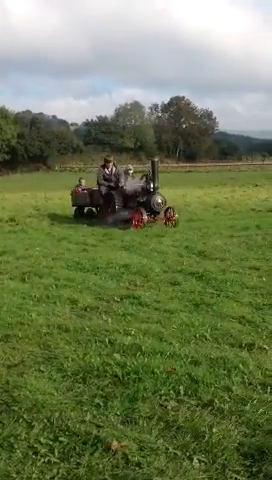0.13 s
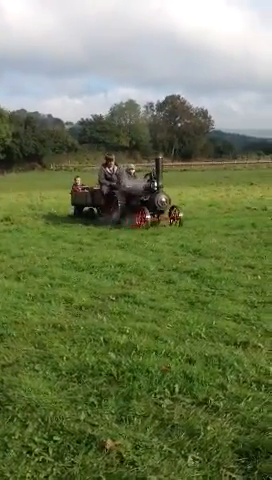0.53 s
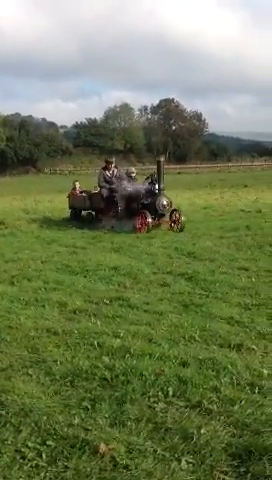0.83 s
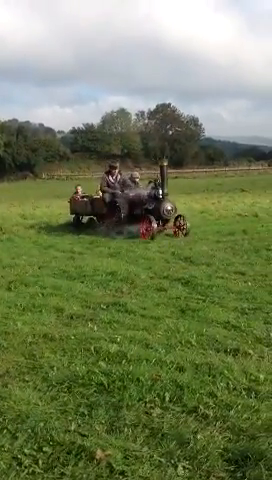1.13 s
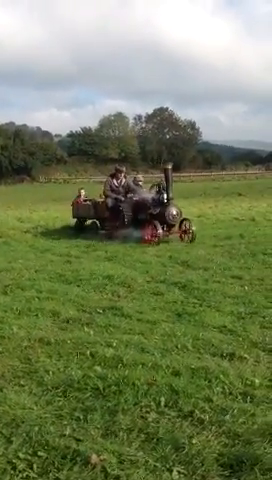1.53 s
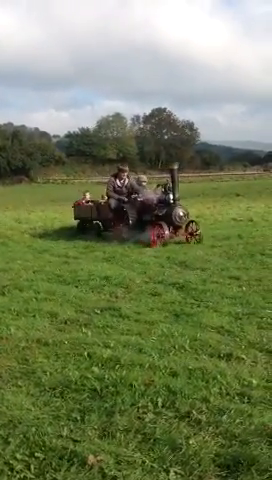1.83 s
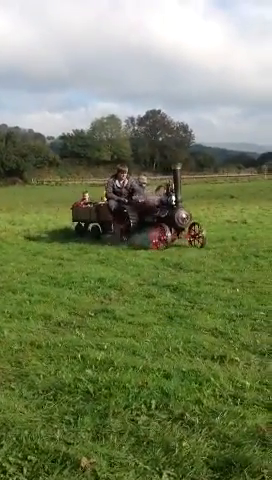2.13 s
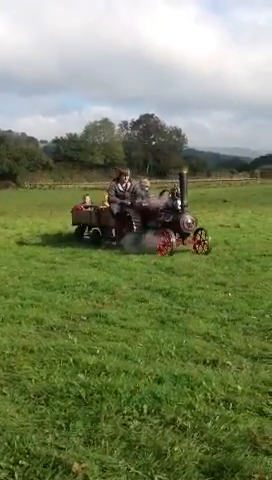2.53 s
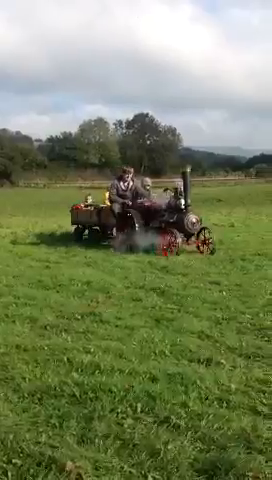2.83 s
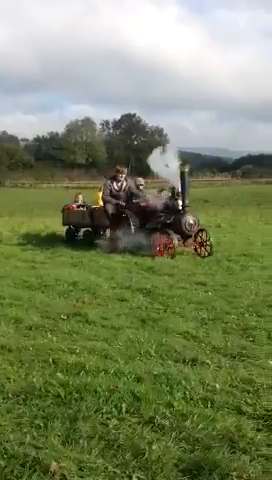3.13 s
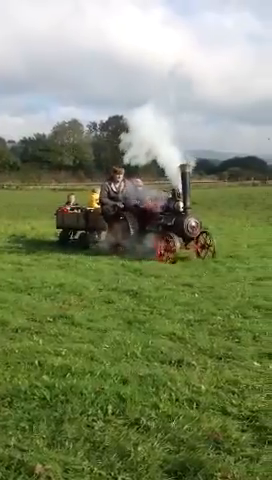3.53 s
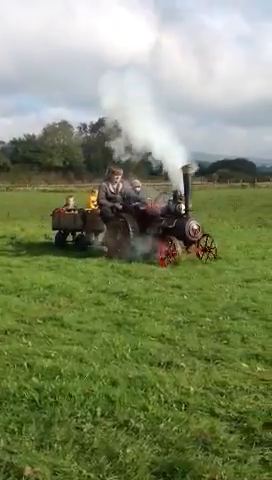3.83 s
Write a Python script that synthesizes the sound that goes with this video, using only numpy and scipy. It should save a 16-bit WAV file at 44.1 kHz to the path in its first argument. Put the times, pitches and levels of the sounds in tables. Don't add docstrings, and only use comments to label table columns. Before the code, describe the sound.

A small steam engine chuffs evenly, about seven crisp, breathy bursts a second, each with a hollow chimney ring and soft low thump, over faint gear drone and distant rumble. The chuffs change colour as it nears. Tiny high squeaks chirp at 1.65-1.85 s. At 2.9 s a whistle starts softly, climbs around 3.2 s, then turns shrill, rough and hissing until 4 s, over weaker chuffs. Open field, single phone microphone.

```python
import sys
import numpy as np
from scipy import signal
from scipy.fft import rfft, irfft
from scipy.io import wavfile
from scipy.ndimage import uniform_filter1d, map_coordinates

SR = 44100
rng = np.random.default_rng(int(sys.argv[2]) if len(sys.argv) > 2 else 0)


def volts(x):
    e = np.asarray(x, float) / 20
    return 10 ** e


def log_audio(samples):
    frames = np.atleast_2d(samples).T
    limited = np.clip(frames, -1, 1)
    pcm = np.round(limited * 32767).astype(np.int16)
    wavfile.write(sys.argv[1], SR, pcm)


N = 176400

# (frequency [Hz], density [dB per Hz])
FIELD_COLOUR = [(35, -50), (60, -21), (226, 4), (705, -7.5), (849, -12), (1590, -8.5), (2010, -11),
                (5580, -14.5), (15500, -27)]
# (frequency [Hz], width [Hz], level [dB])
GEAR_DRONES = [(157.6, 11, -44), (230.9, 2.6, -39.5), (314.2, 4.7, -44.5), (1495, 18, -48)]
# (time [s], gain [dB])
DUCKING = [
    (0, -5),
    (2.9, -3),
    (3.4, -7),
    (4, -8.5),
]
# (time [s], peak level [dB], brightness [dB])
BEATS = [(0.057, -14.5, 2.5), (0.223, -13.5, 0), (0.365, -12.5, -1), (0.524, -16.5, 2), (0.661, -11.5, -2),
         (0.818, -13, -1.5), (0.963, -13, 1), (1.117, -11.5, -2), (1.259, -11, -2), (1.416, -15.5, 2),
         (1.552, -11, -1.5), (1.708, -13, -1), (1.845, -11.5, 0), (1.995, -10.5, -2.5),
         (2.136, -11.5, -0.5), (2.298, -10, -3), (2.439, -11, -1.5), (2.591, -11.5, -1), (2.728, -10, -1),
         (2.879, -10.5, -2), (3.009, -12, -1), (3.157, -11.5, -1), (3.292, -15.5, -2), (3.445, -16, -4),
         (3.569, -16, -2), (3.71, -15.5, -4), (3.846, -19, 0.5), (3.986, -20.5, 1.5)]
# (frequency [Hz], width [Hz], level [dB])
CHIMNEY = [(607, 94, -10), (865, 79, -2), (987, 69, -4.5), (1232, 40, -4.5)]
# (frequency [Hz], density [dB per Hz])
JET_FAR = [(760, -27), (1300, -1), (1580, -12), (2010, 0), (2860, -9.5), (3140, -5.5), (5550, -8),
           (15500, -20)]
# (frequency [Hz], density [dB per Hz])
JET_NEAR = [(760, -33), (1300, -9.5), (1810, -3), (3200, -6.5), (3480, -8), (5110, -6.5), (11400, -14),
            (15500, -20)]
# (frequency [Hz], density [dB per Hz])
PUFF_COLOUR = [(60, -44), (130, -1.5), (180, 0.5), (400, -1), (700, -43)]
# (frequency [Hz], level [dB], T60 [s])
BOILER_BOOM = [(99, -33, .09), (71, -47, 0.38)]
# (time [s], length [s], level [dB], pitch [Hz])
SQUEAKS = [
    (1.642, 0.067, -23, 4905),
    (1.698, .06, -37, 4900),
    (1.748, 0.043, -25, 4865),
    (1.792, 0.013, -30, 4870),
    (1.825, .025, -36, 4860),
]
# (time [s], pitch [Hz], first partial level [dB], third partial level [dB])
WHISTLE = [
    (2.905, 1326, -25, -56),
    (2.935, 1436, -19, -65),
    (3.135, 1438, -21, -62),
    (3.2, 1546, -16.5, -37),
    (3.255, 1611, -15.5, -17.5),
    (3.38, 1648, -14, -17.5),
    (3.6, 1654, -17, -20),
    (3.78, 1678, -16, -17),
    (4, 1664, -22, -16.5),
]
# (time [s], flow level [dB])
STEAM_FLOW = [
    (2.9, -46),
    (3.14, -36.5),
    (3.2, -26.5),
    (3.3, -22),
    (3.6, -23),
    (4, -21.5),
]
# (time [s], length [s], depth [dB])
CHOKES = [
    (3.18, 0.012, -6),
    (3.215, 0.0037, -4),
    (3.369, .007, -8.5),
    (3.376, 0.021, -6.5),
    (3.571, 0.033, -11),
    (3.83, 0.021, -11.5),
]
# (frequency [Hz], density [dB per Hz])
HISS_LOW = [(400, -30), (1000, -11.5), (1900, -8), (2500, -8), (4000, -7), (5450, 0.5)]
# (frequency [Hz], density [dB per Hz])
HISS_HIGH = [(3530, -31), (6000, -3), (14400, -6), (15500, -10)]


def unit(x):
    return x / np.sqrt(np.mean(x ** 2) + 1e-20)


def along(points, hz):
    f, db = np.transpose(points)
    return volts(np.interp(np.log(hz + 1), np.log(f + 1), db))


def curves(rows):
    s, *columns = np.transpose(rows)
    return [np.interp(np.arange(N) / SR, s, column) for column in columns]


def wobble(rate):
    knots = rng.standard_normal(int(N * rate / SR) + 4)
    return map_coordinates(knots, [np.arange(N) * rate / SR])


def peak(f, hz, width_hz):
    return 1j * f * width_hz / (hz * hz - f * f + 1j * f * width_hz)


def noise(response, patchy_db):
    z = signal.stft(rng.standard_normal(N + 512), nperseg=512)[2]
    patches = uniform_filter1d(rng.standard_normal(z.shape), size=5, axis=0)
    patches = uniform_filter1d(patches, size=8, axis=1)
    x = signal.istft(z * volts(patchy_db * unit(patches)), nperseg=512)[1][:N]
    return unit(irfft(rfft(x) * response(np.fft.rfftfreq(N, 1 / SR)), N))


def field():
    duck_db, = curves(DUCKING)
    leak = (2430, 40, -45)
    drones = 0
    for hz, width_hz, db in list(GEAR_DRONES) + [leak]:
        drones = drones + volts(db) * noise(lambda f: peak(f, hz, width_hz), patchy_db=-0.2)
    rumble = volts(-30 + 0.68 * wobble(45)) * noise(lambda f: along(FIELD_COLOUR, f), patchy_db=1.3)
    return volts(duck_db) * (rumble + drones)


def on_beats(stroke, lead_s, levels_db):
    track = np.zeros(N + SR)
    for beat, db in zip(BEATS, levels_db):
        start = max(round((beat[0] - lead_s) * SR), 0)
        track[start:start + len(stroke)] += volts(db) * stroke
    return track[:N]


def chimney_response(f):
    power = (volts(-32) * f ** 2 / (f ** 2 + 450 ** 2)) ** 2
    for hz, width_hz, db in CHIMNEY:
        power = power + abs(volts(db) * peak(f, hz, 1.37 * width_hz) ** 2) ** 2
    split_hz = 1440
    return np.sqrt(power) / (1 + (f / split_hz) ** 8)


def jet_noise():
    near_from_s, near_to_s = 0.92, 2.21
    nearness = np.clip((np.arange(N) / SR - near_from_s) / (near_to_s - near_from_s), 0, 1)
    angle = np.pi / 2 * nearness
    far = np.cos(angle) * noise(lambda f: along(JET_FAR, f), patchy_db=2.0)
    return far + np.sin(angle) * noise(lambda f: along(JET_NEAR, f), patchy_db=2.0)


def steam_jets():
    t = np.arange(SR // 2) / SR
    _, db, bright_db = np.transpose(BEATS)
    lead_s, rise_s = 0.0076, 0.0095
    rise = 1 - np.exp(-(t / rise_s) ** 2)
    burst = rise * (volts(-60 * t / 0.14) + volts(-3 - 60 * t / 0.25))
    ring = rise * volts(-13.5 - 60 * t / 0.5)
    edge = rise * volts(-7 - 60 * t / 0.079)
    low = on_beats(burst + ring, lead_s, db - 9)
    high = on_beats(burst, lead_s, db + bright_db - 1.5)
    crisp = on_beats(edge, lead_s, db + bright_db)
    chimney = low * volts(0.65 * wobble(120)) * noise(chimney_response, patchy_db=0.5)
    jet = high * volts(0.8 * wobble(150)) * jet_noise()
    return chimney + jet + crisp * noise(lambda f: f ** 2 / (f ** 2 + 6000 ** 2), patchy_db=3.0)


def ground_bounce(direct):
    extra_s, growth, gain = 0.0003153, 0.00003, 0.13
    n = np.arange(N)
    bounce = map_coordinates(direct, [n - extra_s * SR - growth * n], mode="nearest")
    return (direct + gain * bounce) / np.sqrt(1 + gain ** 2)


def chimney_puffs():
    t = np.arange(SR // 2) / SR
    puff = (1 - np.exp(-(t / 0.013) ** 2)) * volts(-60 * t / 0.28)
    levels_db = -28.5 + 0.61 * (np.transpose(BEATS)[1] + 12)
    push = on_beats(puff, 0.0076 + 0.011, levels_db)
    return push * noise(lambda f: along(PUFF_COLOUR, f), patchy_db=0.6)


def boiler_booms():
    t = np.arange(SR // 2) / SR
    boom = sum(volts(db - 60 * t / t60) * np.sin(2 * np.pi * hz * t) for hz, db, t60 in BOILER_BOOM)
    return on_beats(boom, 0.0041, 1.5 * rng.standard_normal(len(BEATS))) * volts(curves(DUCKING)[0])


def exhaust():
    return ground_bounce(steam_jets()) + boiler_booms() + chimney_puffs()


def squeak():
    t, out = np.arange(N) / SR, 0
    for s, length_s, db, hz in SQUEAKS:
        swell = np.sin(np.pi * np.clip((t - s) / length_s, 0, 1)) ** 0.66
        sagging_hz = hz - 150 * (t - s - length_s)
        out = out + volts(db + 3) * swell * np.sin(2 * np.pi * sagging_hz * (t - s))
    return out


def whistle_tone(flow_db):
    hz, first_db, third_db = curves(WHISTLE)
    t = np.arange(N) / SR
    phase = 2 * np.pi * np.cumsum(hz * (1 + 0.00214 * wobble(90))) / SR

    choke_db = sum(db * np.exp(-((t - s) / length_s) ** 2) for s, length_s, db in CHOKES)
    blowing = np.clip((flow_db + 55) / 15, 0, 1)
    flutter_db = 1.5 * blowing * (0.68 * wobble(200) + 0.27 * wobble(25.06))
    warble_db = 4.5 * np.exp(-((t - 3.26) / 0.06) ** 2) * np.sin(2 * np.pi * 47 * t + 0.8 * wobble(20))
    first = volts(first_db + choke_db + flutter_db + warble_db) * np.sin(phase)

    second_in = np.clip((t - 3.185) / 0.22, 0.03, 1)
    second_db = flow_db - 5.5 + 5.1 * (t - 3.5) + 1.4 * wobble(55)
    second = second_in * volts(second_db) * np.sin(2 * phase)

    rough_db = wobble(200) + 0.8 * wobble(30)
    third = volts(third_db + rough_db) * np.sin(3 * phase + 0.21 * wobble(200))
    fourth = volts(flow_db - 17 + 4.2 * wobble(60)) * np.sin(4 * phase)
    return first + second + third + fourth


def whistle_steam(flow_db):
    third_db = curves(WHISTLE)[2]
    colour = [(100, -120)] + list(HISS_LOW) + list(HISS_HIGH)[1:]
    hiss = noise(lambda f: along(colour, f), patchy_db=0.1)
    skirt = noise(lambda f: peak(f, 4814, 240) ** 2 / (1 + (f / 5100) ** 40), patchy_db=-0.5)
    skirt = volts(-3.5 + np.minimum(third_db + 22, 0)) * skirt
    return volts(flow_db + 0.8 * wobble(7.2)) * (hiss + skirt)


def whistle():
    flow_db, = curves(STEAM_FLOW)
    valve = np.clip((np.arange(N) / SR - WHISTLE[0][0]) / 0.0095, 0, 1)
    return valve * (np.sqrt(2) * whistle_tone(flow_db) + whistle_steam(flow_db))


def scene():
    return np.tile(field() + exhaust() + squeak() + whistle(), (2, 1))


def top_cut(x):
    return signal.sosfilt(signal.butter(12, 16150, fs=SR, output="sos"), x)


def record(dry):
    top_hz, bass_hz, ceiling = 15100, 55, 0.78
    f = np.fft.rfftfreq(N, 1 / SR)
    band = (f < top_hz) * f ** 6 / (f ** 6 + bass_hz ** 6)
    x = irfft(rfft(dry) * band, N)
    mix = x / (1 + abs(x / ceiling) ** 6) ** (1 / 6)
    return top_cut(mix)


dry = scene()
out = record(dry)
log_audio(out)
```